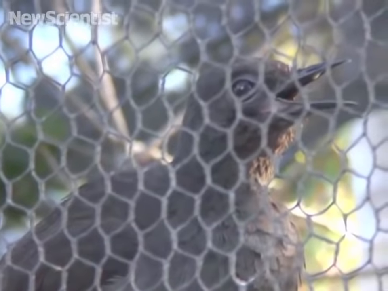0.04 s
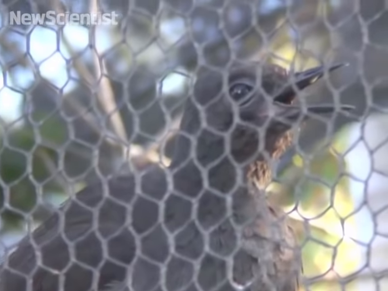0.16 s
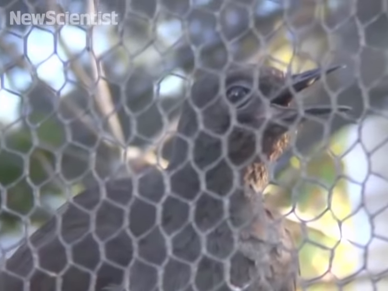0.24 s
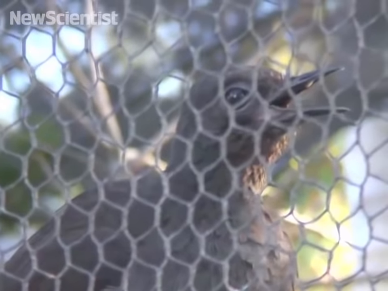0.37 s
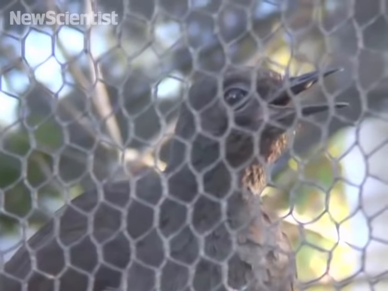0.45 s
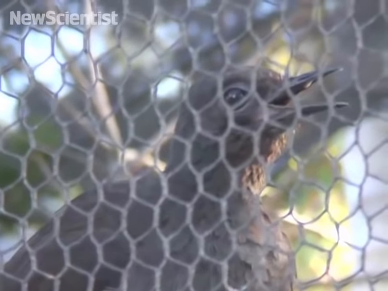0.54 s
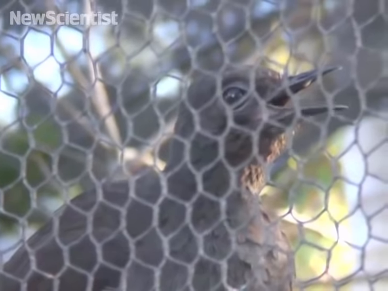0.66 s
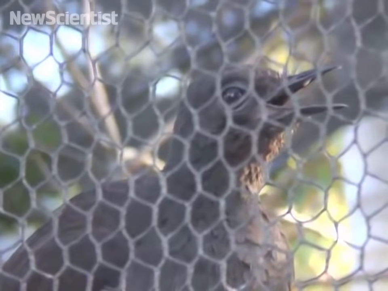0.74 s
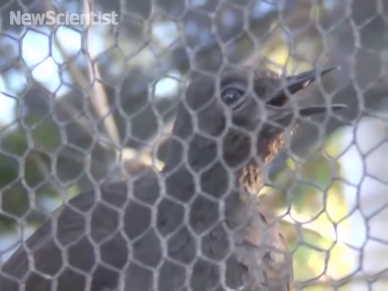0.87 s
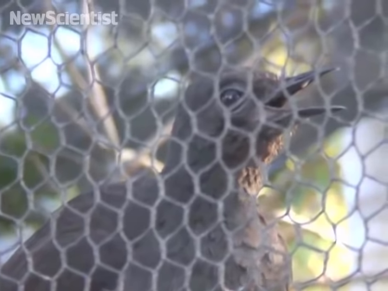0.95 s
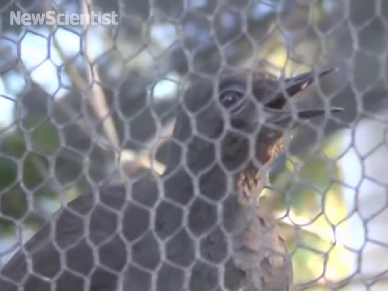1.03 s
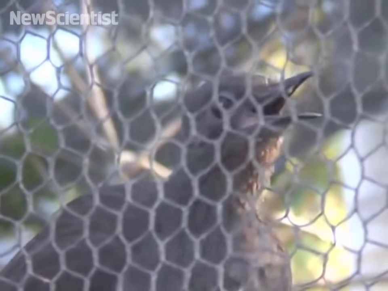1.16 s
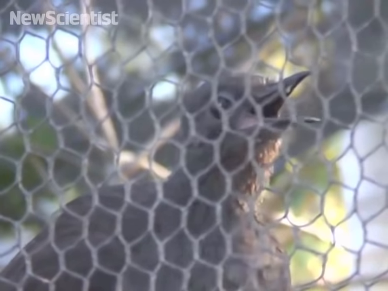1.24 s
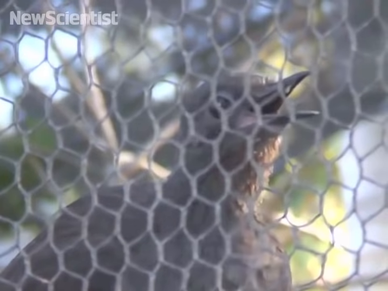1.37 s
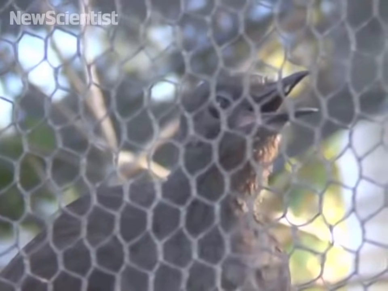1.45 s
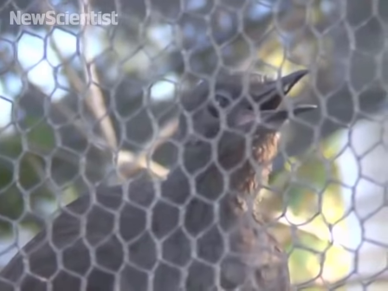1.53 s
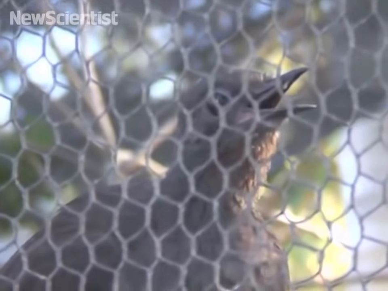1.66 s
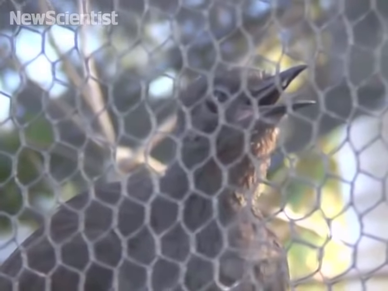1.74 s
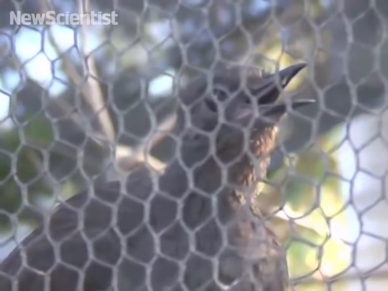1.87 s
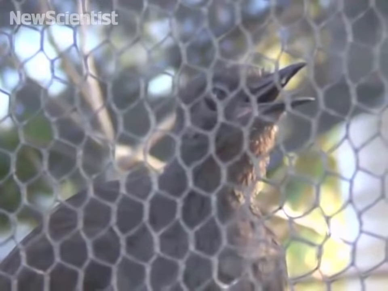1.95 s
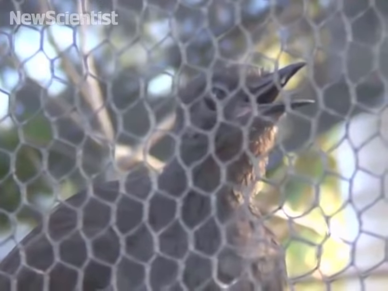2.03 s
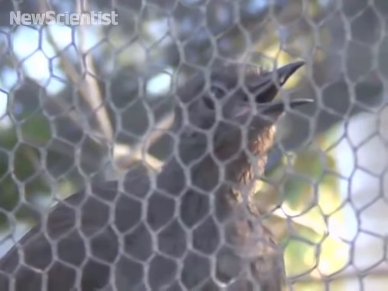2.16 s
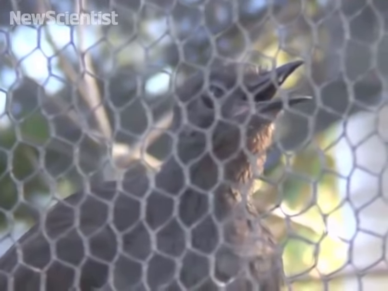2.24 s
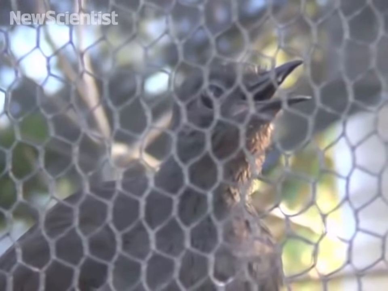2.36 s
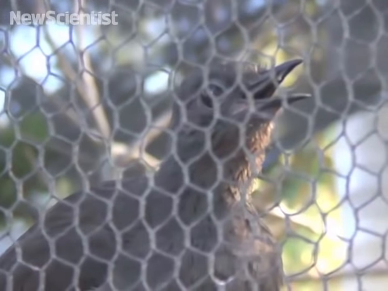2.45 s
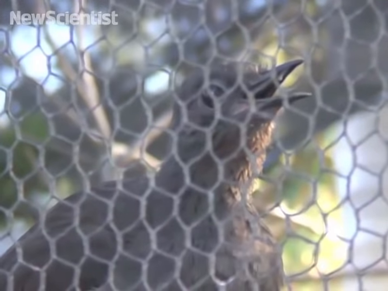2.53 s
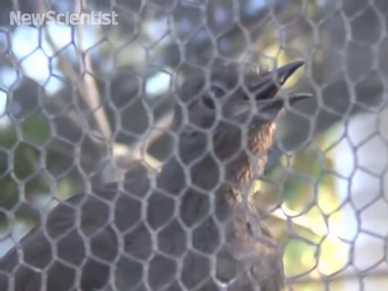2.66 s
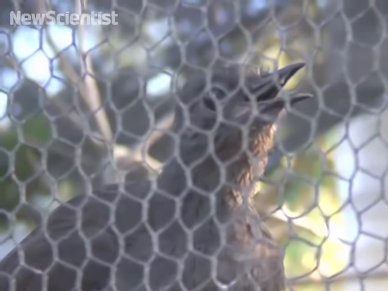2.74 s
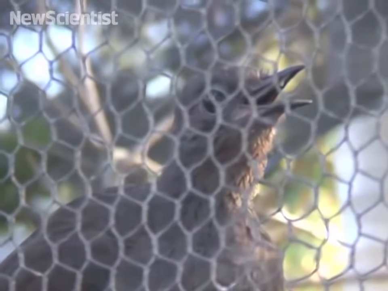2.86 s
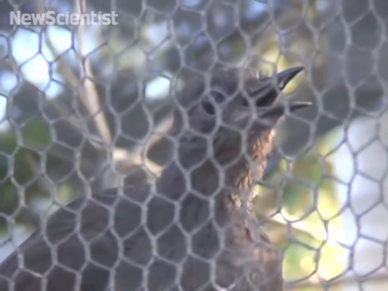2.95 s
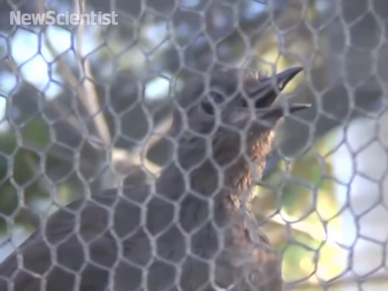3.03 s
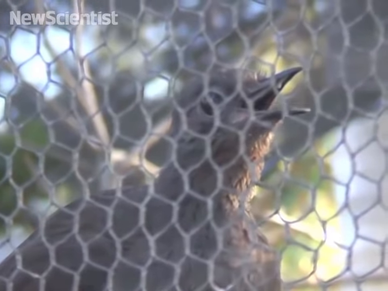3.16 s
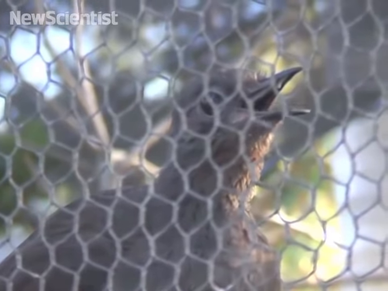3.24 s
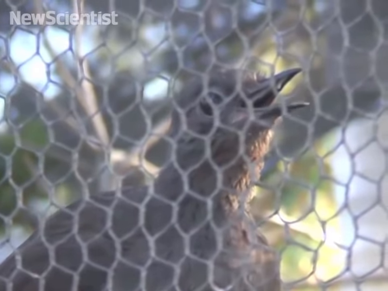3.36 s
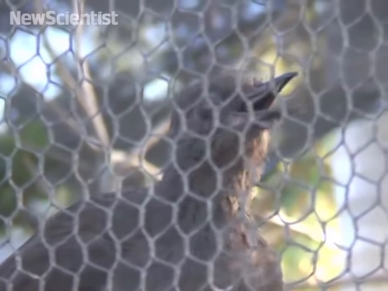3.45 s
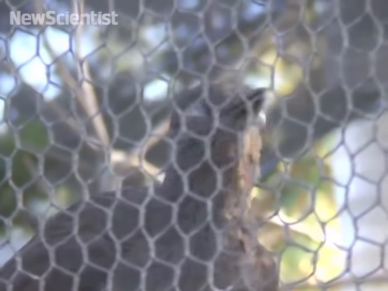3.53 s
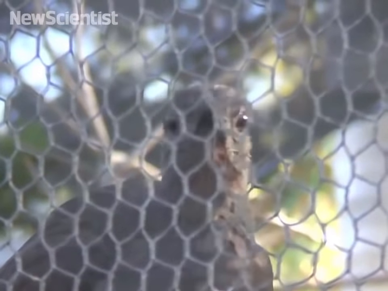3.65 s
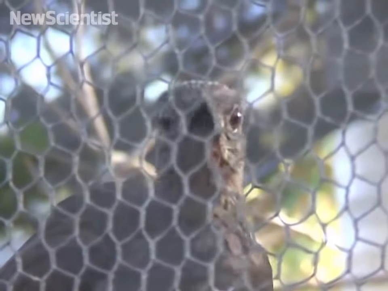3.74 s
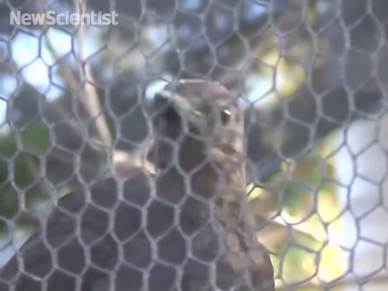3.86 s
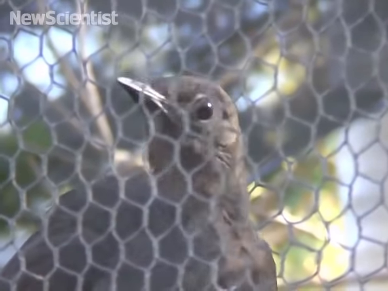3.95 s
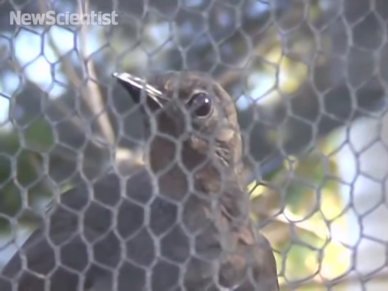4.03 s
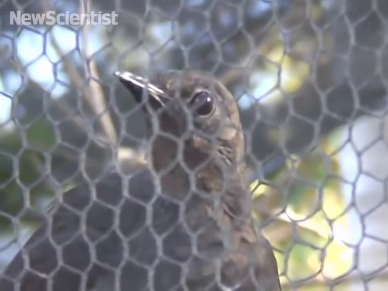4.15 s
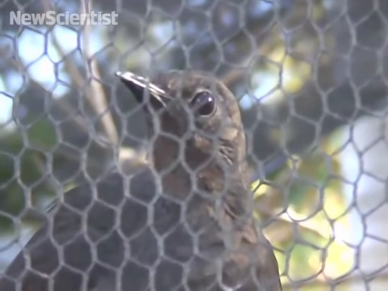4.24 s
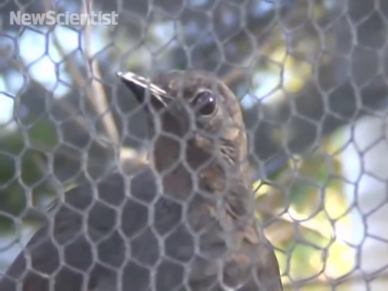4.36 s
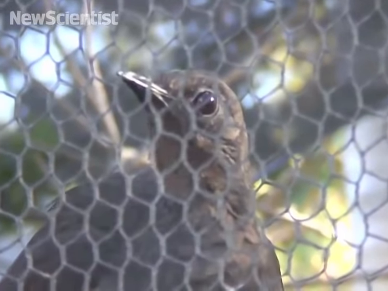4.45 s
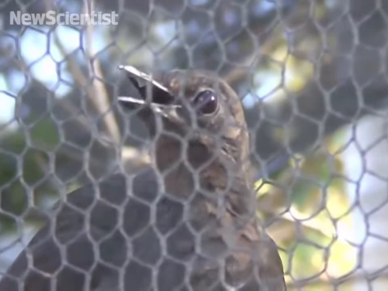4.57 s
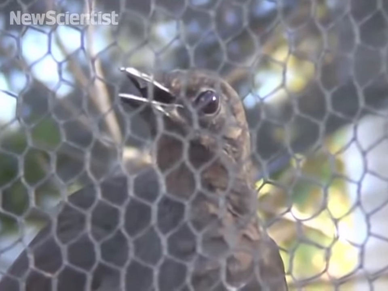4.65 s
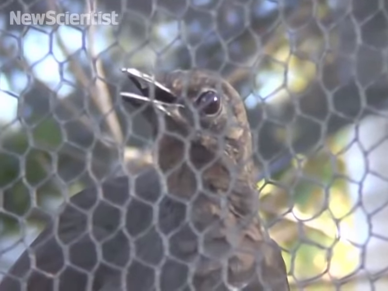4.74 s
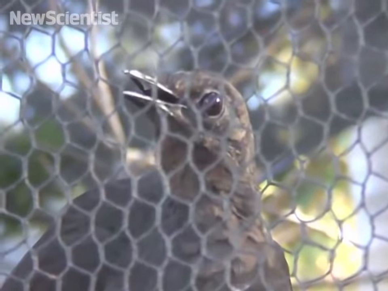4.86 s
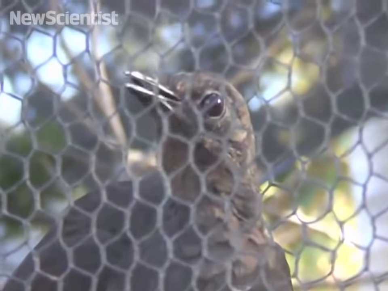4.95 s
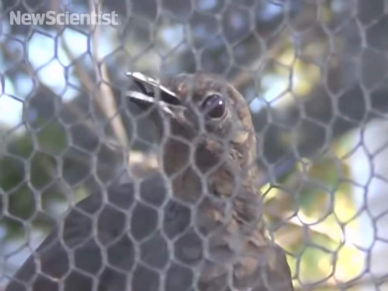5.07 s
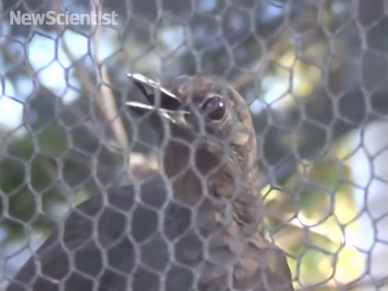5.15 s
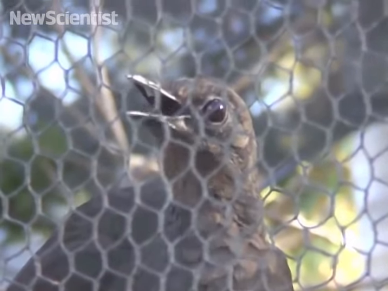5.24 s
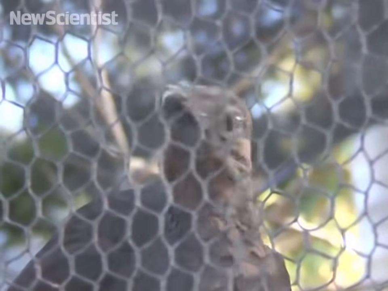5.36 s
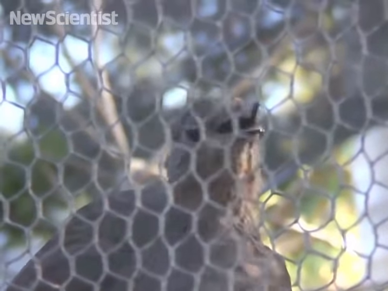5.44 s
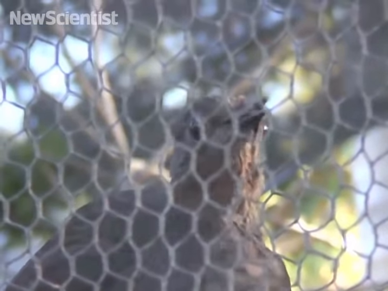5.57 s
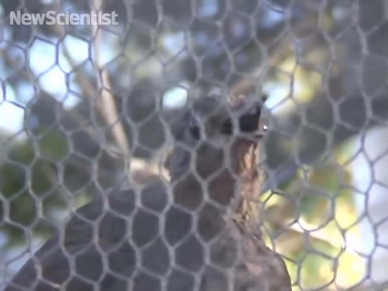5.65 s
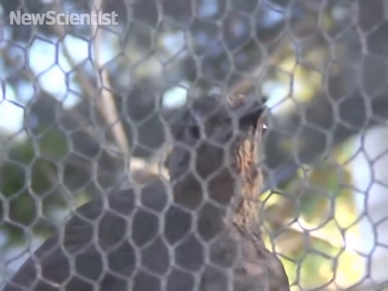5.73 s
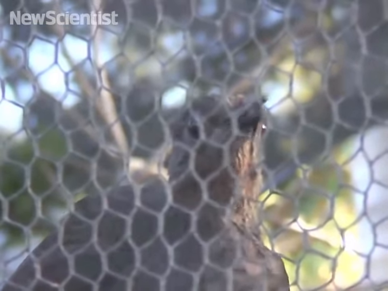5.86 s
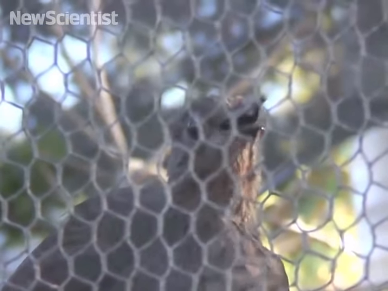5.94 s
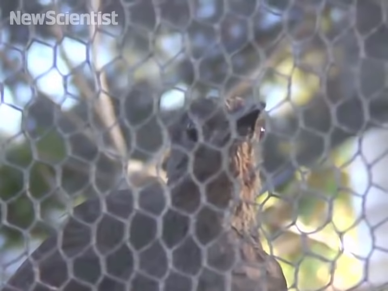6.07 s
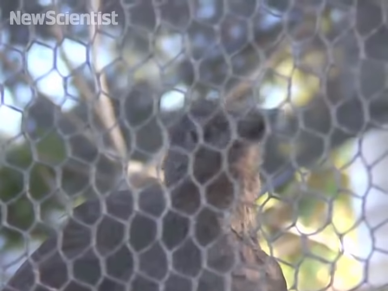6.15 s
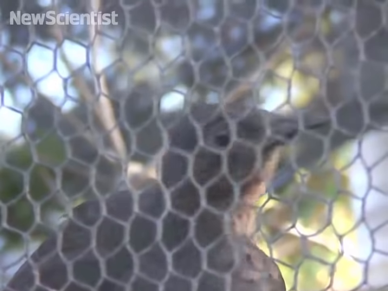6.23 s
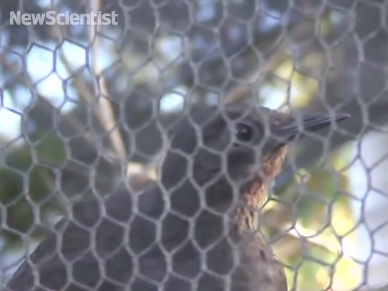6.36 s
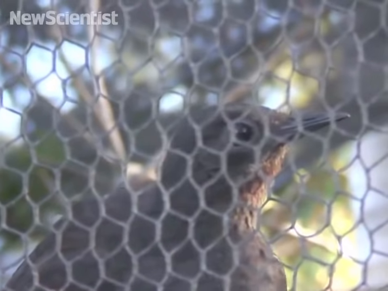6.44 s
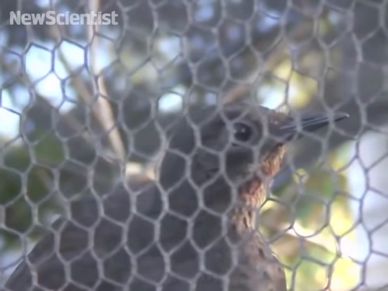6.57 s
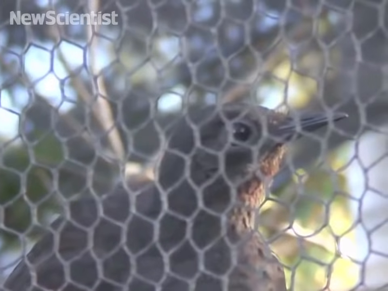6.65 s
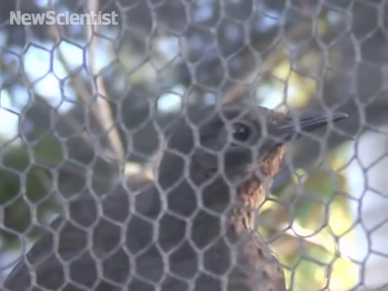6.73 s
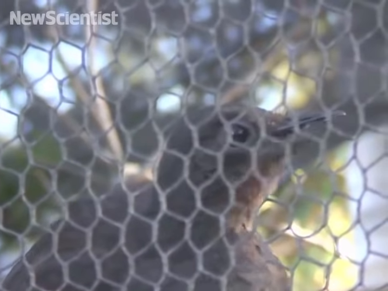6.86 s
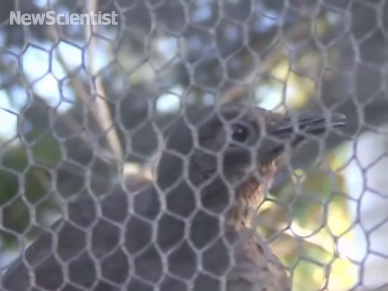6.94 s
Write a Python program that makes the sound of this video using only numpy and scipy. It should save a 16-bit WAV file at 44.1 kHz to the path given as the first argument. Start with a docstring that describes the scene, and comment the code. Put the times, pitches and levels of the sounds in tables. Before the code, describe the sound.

A lyrebird imitates power tools close to the microphone in an outdoor aviary, over a soft hiss and a faint low hum. From the start it sounds like a hammer drill: very rapid, uneven, ringing strokes over a raspy buzz. This stops at about 3.5 seconds with a sharp, loud knock. In the following lull, other birds whistle and call faintly far off, echoing slightly among the trees. At 4.6 seconds the lyrebird sputters with a few quick clicks and becomes a saw, revving five times until about 6.1 seconds. Each rev is a whine that rises and falls, breaking into a rasp; the first two are longer and higher, the last three short and rough. A distant nasal call comes near 6.1 seconds, then two distant rising trills at about 6.4 and 6.7 seconds. One more loud, close knock lands at 6.9 seconds.

```python
"""An aviary with soft outdoor hiss and a faint hum; close to the microphone a lyrebird mimics power tools.
First a hammer drill: ringing strokes over the buzz of its syrinx, ended at 3.5 s by a sharp knock.
Other birds begin to whistle, far off among the trees. From 4.6 s the lyrebird is a saw that sputters
and revs five times, a gliding whine and rasp shaped by its throat. Two distant trills follow,
then one more close knock at 6.9 s."""
import sys
import numpy as np
from scipy import signal
from scipy.fft import rfft, irfft
from scipy.io import wavfile

SR = 44100
rng = np.random.default_rng(int(sys.argv[2]) if len(sys.argv) > 2 else 0)


def dump_mix(stems):
    """Bounce the given channels to the path in sys.argv[1] as a 16-bit WAV at rate SR."""
    frames = np.atleast_2d(stems).T  # one column per channel
    limited = np.clip(frames, -1, 1)  # hard clip at full scale
    pcm = np.round(limited * 32767).astype(np.int16)
    wavfile.write(sys.argv[1], SR, pcm)


N = 308700
TIME = np.arange(N) / SR

# outdoor hiss at the microphone: f/Hz, relative spectral level/dB
AIR_SPECTRUM = [(25, -9), (120, -21), (213, -14), (353, -4.5), (632, -5.5), (824, 0), (1230, -9),
                (2570, -6), (5100, -12), (5900, -12), (8470, -25), (9300, -19.5), (11000, -21),
                (14000, -29)]
# lines of the hum: f/Hz, peak level/dB
HUM_LINES = [(33.3, -77), (50, -79), (66.7, -82), (83.3, -84), (100, -85), (116.7, -87), (150, -74)]
# reverberation among the trees: f/Hz, t60/s
TREE_DECAY = [(300, 0.74), (1000, 0.36), (3000, 0.67), (6000, 0.83), (12000, 0.54)]
# far whistles: t/s, length/s, f/Hz, glide/share of pitch, relative level/dB
FAR_WHISTLES = [(3.619, 0.062, 731, 0.019, -54.5), (3.785, .11, 770, .14, -54),
                (3.832, 0.19, 890, .03, -58.5), (4.084, 0.52, 746, -0.27, -57.5),
                (4.371, 0.17, 912, .02, -57), (4.26, .12, 2940, -.23, -51.5), (4.477, 0.13, 4160, 0, -61),
                (5.588, 0.083, 3704, 0.012, -54), (5.85, .062, 3730, 0.018, -50.5),
                (5.887, .05, 2650, .02, -55), (6.131, 0.061, 3690, 0.08, -51), (6.61, .07, 2800, 0, -54),
                (6.616, 0.34, 895, 0.062, -59.5)]
# far nasal calls: t/s, length/s, f/Hz, glide and arch/share of pitch, relative level/dB
FAR_CALLS = [(3.98, .13, 1610, .06, .06, -54), (6.063, .12, 1530, .047, 0.01905, -45.5)]
# their harmonics, from the fundamental up: relative level/dB
CALL_HARMONICS = [-11, 0.5, 1.5, -1, -15, -17]
# far rising trills: t/s, length/s, relative level/dB
FAR_TRILLS = [(6.396, .18, -39.5), (6.71, .18, -42.5)]
# the squeak that opens each trill: t/s, length/s, relative level/dB
FAR_SQUEAKS = [(6.368, 0.087, -43), (6.714, 0.058, -48)]
# close knocks and sputters: t/s, level/dB, rise/s, decay/s, pulse rate/Hz, treble edge/Hz,
# relative ring level/dB, ring t60/s
KNOCK_EVENTS = [(3.5376, -10.5, 0.0011, 0.0068, 1001, 5120, -5.5, .06),
                (4.608, -26, 0.0006, 0.0082, 914, 6100, -14, .08),
                (4.632, -23.5, 0.00064, 0.0024, 780, 5130, -18, 0.042),
                (4.646, -28, .0008, .003, 720, 5000, -18, .04),
                (4.672, -26, .0008, .003, 720, 5000, -18, .04),
                (6.9448, -5.5, 0.0026, 0.0025, 790, 3080, -13, 0.17)]
# resonances of windpipe and bill for each sound: f/Hz, width/Hz, relative level/dB
KNOCK_MODES = [(450, 34, -5.5), (870, 310, -2), (1510, 360, 2.5), (2100, 560, -5), (2670, 620, 0),
               (4030, 740, 1), (5840, 790, -2), (7540, 310, -5.5), (9300, 940, -5), (11200, 3100, -10)]
RING_MODES = [(448, 78, -5.5), (770, 125, 4.5), (990, 200, -5), (1370, 340, -5.5), (1940, 760, -10),
              (2710, 1100, -16), (4100, 500, -24), (6140, 2700, -23.5)]
SAW_MODES = [(789, 136, 7.5), (1320, 770, -2), (2260, 770, 0), (3340, 520, -2.5), (4290, 880, 1),
             (5880, 800, -3), (7780, 870, -17.5), (9390, 450, -13), (11130, 1270, -15.5)]
DRILL_MODES = [(749, 90, -1), (985, 395, -2), (1497, 390, -3), (2103, 800, 1), (2824, 640, -0.5),
               (4030, 610, 2), (4916, 460, -2.5), (5857, 685, 0), (7734, 420, -9.5), (9300, 560, -10),
               (10930, 890, -13), (12450, 1600, -21.5)]
# revs of the saw: start/s, throttle/s, top/s, end/s, coasting/s, idle f/Hz, top f/Hz, squareness of
# the top, relative level/dB, sag/(dB/s), roughness (0-1) at idle and at the top
SAW_REVS = [(4.612, 4.732, 4.866, 5.135, .143, 728.4, 1336, 4.4, -26.3, 31, .95, .33),
            (5.118, 5.2, 5.315, 5.425, .046, 561, 1720, 2.2, -26.5, 12, .75, .08),
            (5.463, 5.531, 5.58, 5.69, 0.026, 635.7, 857, 1.09, -28, 26, .7, .8),
            (5.675, 5.698, 5.74, 5.82, .041, 541.5, 855, 1.7, -24.5, 48, .35, .48),
            (5.945, 5.965, 5.98, 6.095, .072, 600, 729, 2.77, -26.5, 50, .6, .85)]
# course of the drill: t/s, stroke rate/Hz, relative stroke level/dB, relative rasp level/dB
DRILL_COURSE = [(0.0, 34.87, -20.5, -29.2), (0.1, 43.99, -18.6, -31.1), (0.34, 37.08, -28.3, -31.6),
                (0.64, 33.89, -24.4, -31.9), (0.71, 38.05, -31.5, -31.8), (0.84, 35.6, -21.2, -30.7),
                (0.97, 39.14, -30.9, -32.4), (1.28, 36.62, -16.7, -31.3), (1.63, 37.56, -22.2, -32.7),
                (1.79, 39.16, -17.4, -31.5), (1.85, 29.77, -22.1, -32.2), (2.28, 43.54, -18.4, -30.1),
                (2.34, 39.28, -18.4, -29.3), (2.4, 44.07, -21.2, -29.8), (2.61, 37.03, -20.1, -31.6),
                (2.69, 44.1, -20.7, -31.0), (2.79, 34.37, -30.2, -29.8), (2.92, 41.94, -25.7, -31.1),
                (3.17, 34.66, -23.8, -29.2), (3.23, 37.03, -21.0, -28.8), (3.54, 32.84, -24.3, -31.1)]

EDGE_HZ = 13850  # top of the microphone's band
STROKE_LEAD_S = .005  # a stroke swells this long before its peak


def amp(db):
    """Decibels to amplitude."""
    return 10 ** (np.asarray(db) / 20)


def unit(x):
    """Scale to rms 1."""
    return x / np.sqrt(np.mean(x ** 2) + 1e-20)


def read(points, hz):
    """A table's value at hz, on a log frequency axis."""
    f, value = np.transpose(points)
    return np.interp(np.log(hz + 1), np.log(f + 1), value)


def add(mix, s, sound):
    """Mix a sound in at s seconds."""
    part = mix[max(round(s * SR), 0):][:len(sound)]
    part += sound[:len(part)]


def gate(start, end, fade):
    """Open from start to end, with linear fades."""
    return np.clip((TIME - start) / fade, 0, 1) * np.clip((end - TIME) / fade, 0, 1)


def cut(x, order, hz, kind="low"):
    """Low- or high-pass filter."""
    return signal.sosfilt(signal.butter(order, hz, kind, fs=SR, output="sos"), x)


def wander(hz, size=N):
    """Smooth random drift of rms 1, up to about hz."""
    rolloff = np.exp(-(np.fft.rfftfreq(size, 1 / SR) / hz) ** 2)
    return unit(irfft(rfft(rng.standard_normal(size)) * rolloff, size))


def background(air_db=-54, drift_db=1.1):
    """The bed of the place: drifting outdoor hiss and a low steady hum."""
    spectrum = amp(read(AIR_SPECTRUM, np.fft.rfftfreq(N, 1 / SR)))
    air = unit(irfft(rfft(rng.standard_normal(N)) * spectrum, N))
    hum = sum(amp(db) * np.cos(2 * np.pi * hz * TIME) for hz, db in HUM_LINES)
    return air * amp(air_db + drift_db * wander(1.3)) + hum


def trees(x):
    """Echoes scattered back by the trees, each band dying at its own speed."""
    taps = rng.standard_normal(SR) * (rng.random(SR) < .1) * (TIME[:SR] > .006)
    hz, t, bands = signal.stft(taps, SR, nperseg=256)
    tail = signal.istft(bands * amp(-60 * t / read(TREE_DECAY, hz)[:, None]), SR, nperseg=256)[1]
    return signal.fftconvolve(x, tail / np.linalg.norm(tail))[:N]


def note(length, hz, glide, arch, warble=.016, stack_db=(0,)):
    """A far bird's note: an arched glide that warbles, with the given harmonics."""
    u = np.linspace(-1, 1, int(length * SR))
    pitch = hz * (1 + glide * u / 2 - arch * u ** 2) * (1 + warble * wander(280, SR)[:len(u)])
    phase = 2 * np.pi * np.cumsum(pitch) / SR
    tone = sum(amp(db) * np.sin(k * phase) for k, db in enumerate(stack_db, 1))
    return unit(tone) * signal.windows.tukey(len(u), .5)


def squeak(length, hz=6700, swing_hz=650, swings_per_s=23, warble=.016):
    """A thin note that swings down and up again."""
    t = np.arange(int(length * SR)) / SR
    pitch = hz + swing_hz * np.cos(2 * np.pi * swings_per_s * t)
    pitch *= 1 + warble * wander(263, SR)[:len(t)]
    return unit(np.sin(2 * np.pi * np.cumsum(pitch) / SR)) * signal.windows.tukey(len(t), .5)


def other_birds():
    """Far from the microphone: pure whistles, nasal calls, and trills that open with a squeak."""
    out = np.zeros(N)
    for s, length, hz, glide, db in FAR_WHISTLES:
        add(out, s, amp(db) * note(length, hz, glide, arch=.0253))
    for s, length, hz, glide, arch, db in FAR_CALLS:
        add(out, s, amp(db) * note(length, hz, glide, arch, stack_db=CALL_HARMONICS))
    for s, length, db in FAR_TRILLS:
        add(out, s, amp(db) * note(length, hz=4980, glide=.44, arch=.07, warble=.072, stack_db=(0, -21)))
    for s, length, db in FAR_SQUEAKS:
        add(out, s, amp(db) * squeak(length))
    return out


def response(modes, hz):
    """Gain of a set of steep-sided resonances; a small throat radiates no bass."""
    power = sum(amp(db) ** 2 / (1 + ((hz - f) / (.59 * width)) ** 2) ** 2 for f, width, db in modes)
    return np.sqrt(power / (1 + (400 / (hz + 1)) ** 6))


def throat(x, modes, edge_hz=SR, size=4096):
    """Windpipe and bill: a causal filter with those resonances and a treble edge."""
    hz = abs(np.fft.fftfreq(size, 1 / SR))
    log_gain = np.log(response(modes, hz) / np.sqrt(1 + (hz / edge_hz) ** 4) + 1e-4)
    taps = np.fft.ifft(np.exp(np.conj(signal.hilbert(log_gain)))).real[:size // 2]  # minimum phase
    return signal.oaconvolve(x, taps / np.linalg.norm(taps))[:len(x)]


def syrinx(hz):
    """One click for each closing of the syrinx, placed between samples."""
    turns = np.cumsum(hz) / SR
    at = np.flatnonzero(np.diff(np.floor(turns)) > 0)
    late = (np.ceil(turns[at]) - turns[at]) * SR / hz[at]
    out = np.zeros(len(hz))
    out[at], out[at + 1] = 1 - late, late
    return unit(out)


def knocks(noisy=.66, ring_rise_s=.0073, ceiling=.9):
    """A few violent pulses swell and die within milliseconds, and leave a dull ring."""
    t, out = np.arange(SR // 4) / SR, np.zeros(N)
    for s, db, rise, decay, hz, edge_hz, ring_db, ring_t60 in KNOCK_EVENTS:
        swell = np.minimum(t / rise, 1) * np.exp(-np.maximum(t - rise, 0) / decay)
        pulses = syrinx(hz * (1 + .603 * np.exp(-t / .002086)))
        burst = (1 - noisy) * pulses + noisy * rng.standard_normal(len(t))
        ring_shape = (1 - np.exp(-t / ring_rise_s)) * amp(-60 * t / ring_t60)
        ring = throat(rng.standard_normal(len(t)) * ring_shape, RING_MODES)
        add(out, s, amp(db) * (throat(burst * swell, KNOCK_MODES, edge_hz) + amp(ring_db) * ring))
    rounded = ceiling * np.tanh(out / ceiling)  # the hardest peaks round off
    return cut(rounded, 4, 270, "high")


def rev(start, throttle, top, end, coast_s, idle_hz, top_hz, hold, db, sag_db, idle_rough, top_rough,
        rest_hz=406, spin_up_s=.04, attack_s=.022, release_s=.036, idle_db=-1.5, opening_s=.021):
    """Pitch, level and roughness of one rev: it spins up, climbs under throttle, coasts and weakens."""
    spin = np.clip((TIME - start) / spin_up_s, 0, 1)
    to_go = np.clip((top - TIME) / max(top - throttle, 1 / SR), 0, 1)
    climb = 1 - to_go ** (1 + .22 * hold)  # a rev that holds its top also eases into it
    coast = np.exp(-(np.maximum(TIME - top, 0) / coast_s) ** hold)
    hz = rest_hz + ((idle_hz - rest_hz) * spin + (top_hz - idle_hz) * climb) * coast
    fade = np.clip(np.minimum((TIME - start) / attack_s, (end - TIME) / release_s), 0, 1)
    driven_s = np.clip(TIME - throttle, 0, end - throttle)
    effort_db = db + idle_db * np.exp(-driven_s / opening_s) - sag_db * driven_s
    stall_db = -15 * (rest_hz / hz) ** 3.95  # level lost at low speed
    driven_rough = idle_rough + (top_rough - idle_rough) * climb
    rough = driven_rough * coast + .28 * (1 - coast)
    return hz, effort_db + stall_db + 20 * np.log10(fade + 1e-6), rough


def motor():
    """The revs in a row: the loudest at each moment has the voice."""
    revs = np.array([rev(*row) for row in SAW_REVS])
    loudest = revs[:, 1].argmax(0)
    return revs[loudest, :, np.arange(N)].T


def overtones(turns, hz, slope_db=-6):
    """The saw's upper harmonics, weighted by the throat as they glide through it."""
    orders, grid = np.arange(2, 22)[:, None], np.arange(0, SR, 20)
    on = (TIME > 4.6) & (TIME < 6.12)  # while the saw runs
    gains = np.interp(orders * hz[on], grid, response(SAW_MODES, grid))
    gains *= amp(slope_db * np.log2(orders)) * (orders * hz[on] < EDGE_HZ)
    out = np.zeros(N)
    out[on] = (gains * np.cos(2 * np.pi * orders * turns[on])).sum(0) / np.sqrt((gains ** 2).sum(0) / 2)
    return out


def saw(level_db=.5, tone_db=-2.8, whine_db=-1, half_db=-9, flutter_hz=68, flutter_db=4, bright_db=-31):
    """A gliding harmonic whine; when rough it stumbles and breaks into a rasp, puffed once a cycle."""
    hz, effort_db, rough = motor()
    effort_db = effort_db + level_db
    rough = np.clip(rough, .02, .98)
    stumble = .022 * wander(130) + .15 * rough ** 1.5 * np.minimum(700 / hz, 1) * wander(400)
    turns = np.cumsum(hz * (1 + stumble)) / SR
    flutter = np.sin(2 * np.pi * np.cumsum(flutter_hz * (1 + .0985 * wander(30.7))) / SR)
    flutter *= 1 - .91 * gate(4.52, 6.5, .21)  # strongest as the saw starts up
    puffs = rng.standard_normal(N) * (.29 + np.exp(-(turns % 1) / .32)) * amp(flutter_db * flutter)
    rasp = unit(throat(puffs, SAW_MODES))
    swell_db = 1.5 * np.exp(-((hz - 820) / 47) ** 2)  # gliding through the lowest throat resonance
    bass_loss_db = 10 * np.log10(1 + (470 / hz) ** 4)
    shimmer_db = 3 * (np.sqrt(rough) * wander(130) - rough)
    fundamental = np.sqrt(2) * np.sin(2 * np.pi * turns)
    fundamental *= amp(tone_db + swell_db - bass_loss_db + shimmer_db)
    whine = overtones(turns, hz) * unit(amp(3 * wander(150) + 1.5 * flutter))
    # at high pitch, strong and weak cycles alternate: lines halfway between the harmonics
    halves = sum(np.sin(np.pi * k * turns) for k in (1, 3, 5))
    halves *= (1 + flutter) * rough * np.clip(hz / 400 - 2, 0, 1)
    upper = amp(whine_db) * np.sqrt(1 - rough) * whine + rough ** .8 * rasp + amp(half_db) * halves
    push = np.minimum(amp(effort_db - bright_db), 1)  # soft notes are dull
    voice = fundamental + push * upper + (1 - push) * 1.4 * cut(upper, 1, 2000)
    return cut(voice * amp(effort_db) * gate(SAW_REVS[0][0], 7, fade=.1), 4, 340, "high")


def stroke(hz, db, bend_s=.0007, rise_s=.0013, fall_s=.001, chirp_db=-6, spit_db=-9, spit_s=.0018):
    """One drill stroke: a ringing note swells, flicks upward and snaps off in a spit of noise."""
    t = np.arange(-STROKE_LEAD_S, .01, 1 / SR)
    glide = np.minimum(hz * (.9 + .25 * np.exp(t / bend_s)), 6100)
    chirp = np.sin(2 * np.pi * (np.cumsum(glide) / SR + rng.random()))
    chirp *= np.exp(np.minimum(t / rise_s, -t / fall_s))
    spit = signal.lfilter([1, -.15], 1, rng.standard_normal(len(t)))
    spit *= np.exp(np.minimum(2 * t / bend_s, -t / spit_s))
    # even soft strokes spit: the noise follows the strength only in part
    return amp(db + chirp_db) * chirp + amp(.6 * db + spit_db) * spit


def hammering(rate, level_db, rebound_s=.0045, rebound_db=-7, spread_db=1.2, deep_hz=1300):
    """A train of uneven strokes, each with a weaker rebound."""
    beat = np.cumsum(rate) / SR - .28
    ring_hz = 2399 + 28 * (level_db + 22)  # harder strokes ring higher
    out = np.zeros(N)
    for at in np.flatnonzero((np.diff(np.floor(beat)) > 0) & (TIME[1:] < 3.52)):
        start = at / SR - STROKE_LEAD_S
        for delay, db in ((0, 0), (rebound_s, rebound_db)):
            size, colour = rng.standard_normal(2)
            hit = stroke(ring_hz[at] * np.exp(.109 * colour), level_db[at] + .6 + spread_db * size)
            add(out, start + delay, amp(db) * hit)
        if 1.38 < TIME[at] < 2.15:  # midway through, a deeper note knocks along with each stroke
            add(out, start, stroke(deep_hz * rng.uniform(.88, 1.12), level_db[at] - 3, spit_db=-60))
    return out


def drill(buzz_hz=950, jitter=.22, breathy=.53, rasp_db=-.7, end_s=3.54, bill_opens_s=(.48, 2.4)):
    """Hammering over a duller chaotic buzz of the syrinx; the bill widens and lets out more treble."""
    s, *columns = np.transpose(DRILL_COURSE)
    rate, level_db, bed_db = (np.interp(TIME, s, column) for column in columns)
    strokes = hammering(rate, level_db)
    buzz = syrinx(buzz_hz * np.exp(jitter * wander(500)))
    breath = rng.standard_normal(N)
    rasp = unit(((1 - breathy) * buzz + breathy * breath) * amp(1.5 * wander(200)))
    rasp = cut(rasp, 1, 7000) * amp(bed_db + rasp_db) * gate(-1, end_s, .0032)
    voice = throat(strokes + rasp, DRILL_MODES)
    treble = signal.sosfiltfilt(signal.butter(2, 6500, "high", fs=SR, output="sos"), voice)
    treble_db = np.interp(TIME, bill_opens_s, (-3, .8))
    return voice + treble * (amp(treble_db) - 1)


def scene(near_wet_db=-26, far_dry_db=-3, far_wet_db=-3):
    """One microphone in the aviary: the lyrebird close and dry, the other birds far and echoing."""
    near, far = drill() + saw() + knocks(), other_birds()
    echoes = trees(amp(near_wet_db) * near + amp(far_wet_db) * far)
    return (near + amp(far_dry_db) * far + echoes + background())[None]


def record(dry):
    """The microphone's band ends steeply at EDGE_HZ."""
    taps = signal.firwin(201, EDGE_HZ, window=("kaiser", 9), fs=SR)
    return signal.oaconvolve(dry, taps[None], "same")


dry = scene()
out = record(dry)
dump_mix(out)
```